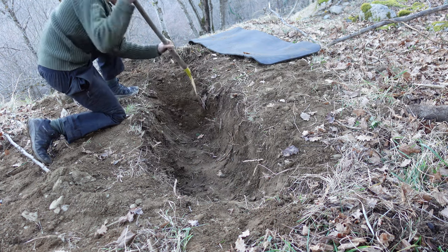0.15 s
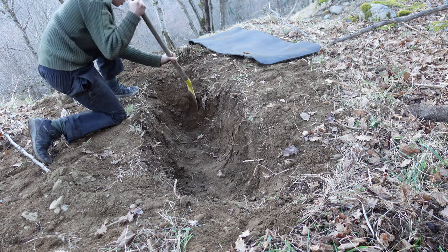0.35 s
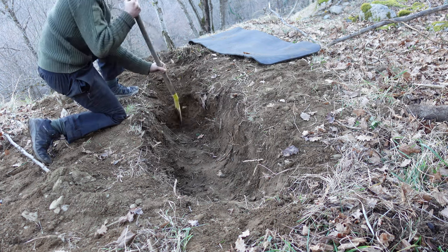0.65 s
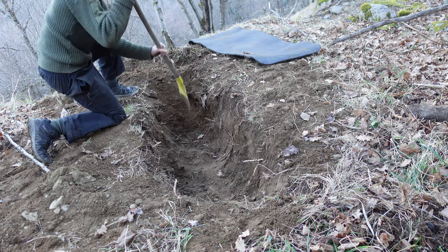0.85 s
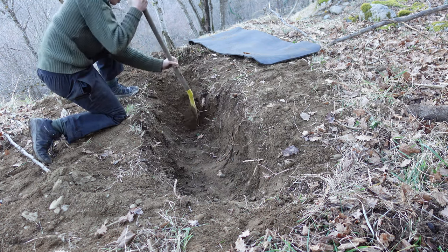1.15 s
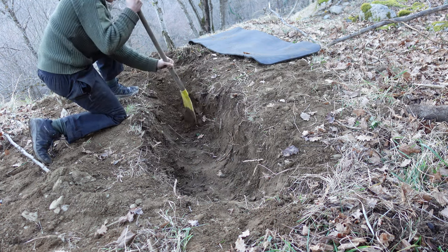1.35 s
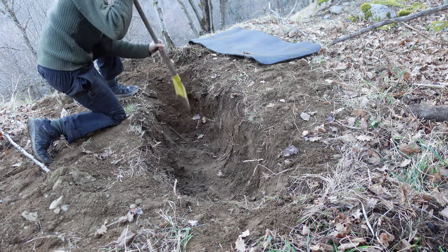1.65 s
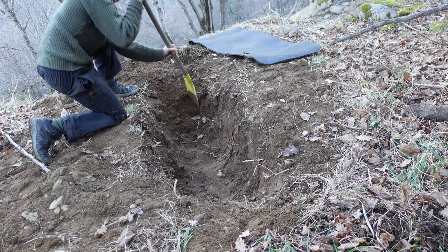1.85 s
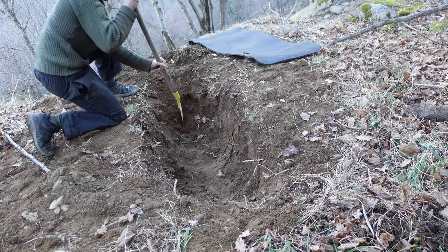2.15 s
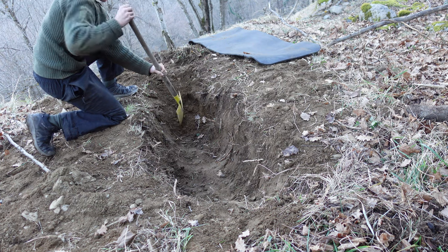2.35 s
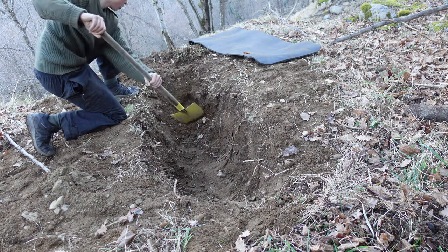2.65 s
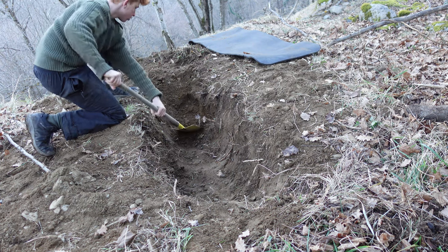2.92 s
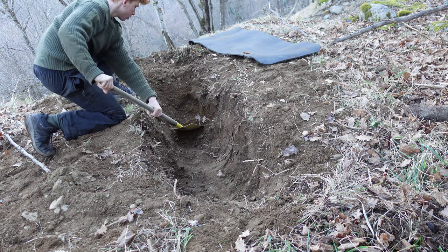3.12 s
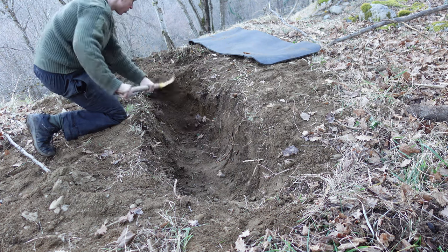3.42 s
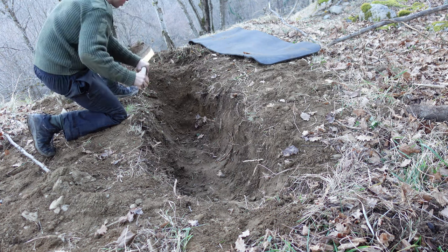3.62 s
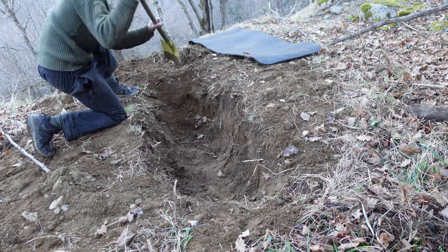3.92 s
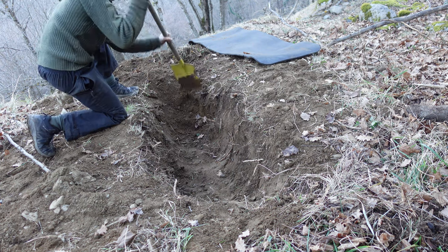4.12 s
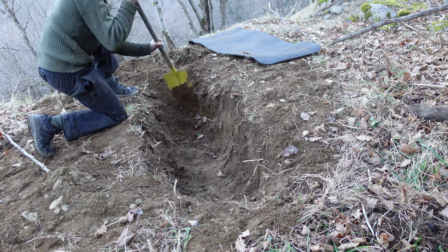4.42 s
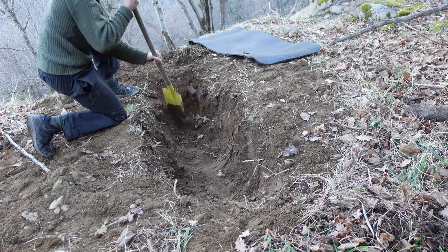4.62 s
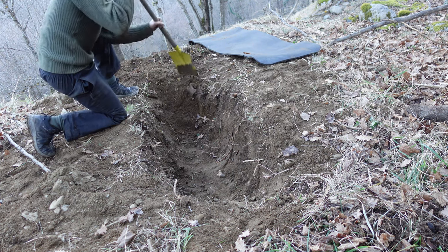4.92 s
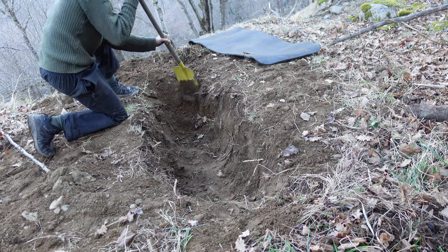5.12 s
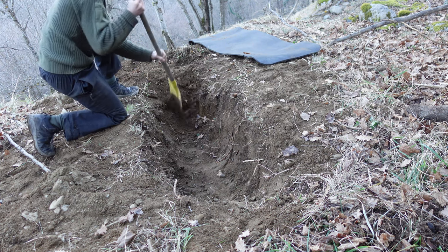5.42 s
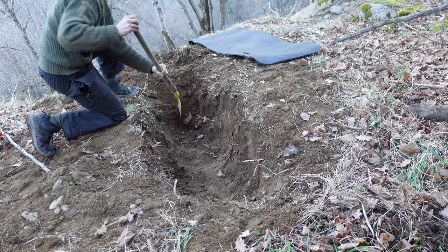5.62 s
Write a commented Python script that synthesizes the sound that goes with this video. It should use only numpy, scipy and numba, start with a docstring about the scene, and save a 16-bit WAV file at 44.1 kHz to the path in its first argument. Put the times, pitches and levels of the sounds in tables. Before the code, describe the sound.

A small steel shovel digs into stony soil on a wooded slope. Chops come irregularly, each a crisp gritty crunch with stone clacks and a soft low thud; a rapid clatter of stones follows just after two seconds. After a near-silent pause, the hardest, most ringing hits come around 4.2 to 4.5 seconds, then more chops past five. Close stereo microphones, dry and open, with a faint distant roar.

```python
"""Shovel in stony soil

A short steel shovel chops and scrapes into stony soil on a wooded slope.
Grit crunches along the blade as dense trains of grains; stones knock it with short pitched bursts of noise.
The blade is a bank of decaying modes, ringing when it is free and choked when buried.
Chops thud into the ground as low noise bursts; a far steady roar of shaped noise fills the valley."""
import sys
import numpy as np
from scipy import signal
from scipy.io import wavfile
from numba import njit

SR = 44100
rng = np.random.default_rng(int(sys.argv[2]) if len(sys.argv) > 2 else 0)


def transcribe(signal):
    """Save signal, clipped to [-1, 1], as a 16-bit WAV file at the path in sys.argv[1]."""
    frames = np.atleast_2d(signal).T
    limited = np.clip(frames, -1, 1)
    pcm = np.round(limited * 32767).astype(np.int16)
    wavfile.write(sys.argv[1], SR, pcm)


def invert_db(level):
    """Linear amplitude ratio for a level in decibels (20 dB per decade), elementwise."""
    return 10 ** (np.asarray(level, dtype=float) / 20)


N = 254456


def at_hz(points, hz):
    """Interpolation of a spectrum along a logarithmic frequency axis."""
    table = np.array(points)
    return np.interp(np.log(hz), np.log(table[:, 0]), table[:, 1])


def rms_one(x):
    """Normalisation to unit root mean square."""
    return x / np.sqrt(np.mean(x ** 2) + 1e-20)


def band(x, low_hz, high_hz):
    """Band-pass filtering with Butterworth slopes."""
    sos = signal.butter(2, [low_hz, min(high_hz, .45 * SR)], "band", fs=SR, output="sos")
    return signal.sosfilt(sos, x)


def drift(rate_hz):
    """Slow random modulation: white noise through a double-pole low-pass, unit spread."""
    pole = np.exp(-2 * np.pi * rate_hz / SR)
    slow = signal.lfilter([1], [1, -2 * pole, pole * pole], rng.standard_normal(N + SR))
    return rms_one(slow[SR:])   # the filter has settled by then


def spans(rows, elsewhere):
    """Piecewise-constant control: a value that holds over each span."""
    value = np.full(N, float(elsewhere))
    for start_s, end_s, inside in rows:
        value[round(start_s * SR):round(end_s * SR)] = inside
    return value


# Relative spectral density of the roar: pitch_hz [Hz], level_db [dB per Hz]
ROAR_SPECTRUM = [(15, -65), (25, -31), (114, -10), (180, -5), (223, -3.5), (277, -0.5), (317, -5.5),
                 (354, -1), (641, 2.5), (1440, 0), (2760, -12), (2990, -13), (5000, -21), (16000, -29.5)]
# Left-right correlation of the roar: pitch_hz [Hz], likeness [-1 to 1]
ROAR_LIKENESS = [(60, 1), (290, 0.78), (640, 0.83), (1410, 0.24), (3100, 0.05), (15000, 0.27)]
ROAR_DB = -54   # rms


def roar():
    """Diffuse field: far, smooth noise in half-octave bands, its channels least alike in the treble."""
    out, edges_hz = 0, 22 * 2 ** np.arange(0, 9.9, .5)
    swell_db = 1.1 * drift(1.5)
    white = rng.standard_normal((2, 2, N + SR))
    for k, (low, high) in enumerate(zip(edges_hz, edges_hz[1:])):
        mid, side = band(white[k % 2], low, high)[:, SR:]
        hz = np.sqrt(low * high)
        alike = np.clip(at_hz(ROAR_LIKENESS, hz), -1, 1)
        stereo = np.sqrt(1 + alike) * mid + np.sqrt(1 - alike) * side * [[1], [-1]]
        out = out + invert_db(at_hz(ROAR_SPECTRUM, hz) + swell_db) * stereo
    return invert_db(ROAR_DB) * rms_one(out)


# Chops into the ground: start_s [s], level_db [dB, peak of the thud]
THUDS_PLAYED = [(0.271, -46.5), (1.112, -41), (1.449, -46), (1.852, -42.5), (2.086, -48), (2.879, -45.5),
                (3.241, -54), (4.159, -42.5), (4.351, -49), (4.505, -50), (5.052, -48), (5.44, -54.5)]
THUD_T60_S, SHUDDER_DB = 0.19, -6   # decay; gain of the lower octave


def thuds():
    """Damped impact response: the ground takes a soft push and shudders low."""
    out, size = np.zeros(N), 9000
    t = np.arange(size) / SR
    for (start_s, level_db), noise in zip(THUDS_PLAYED, rng.standard_normal((len(THUDS_PLAYED), size))):
        push = noise * (1 - np.exp(-t / 0.0054)) * invert_db(-60 * t / THUD_T60_S)
        low = band(band(push, 54, 110), 54, 110)
        shudder = band(push, 107, 212) + invert_db(SHUDDER_DB) * low
        at = round(start_s * SR)
        out[at:at + size] += invert_db(level_db) * shudder / abs(shudder).max()
    return out


# The blade runs over bare rock: start_s [s], end_s [s], gain_db [dB on clods and dull knocks]
ROCK_SPANS = [(.53, .595, -6.5), (1.06, 1.1, -4.5), (1.81, 1.845, -7), (2.1, 2.22, -3.5), (2.9, 2.92, 5.5),
              (4.44, 4.495, -13), (5.26, 5.428, -17), (5.428, 5.48, -7.5), (5.585, 5.63, -9)]


def bare_rock():
    """Surface dependence: bare rock alters the level of the clods and dull knocks."""
    return spans(ROCK_SPANS, 0)


# Stones struck: start_s [s], level_db [dB, peak at stone pitch], pitch_hz [Hz], crack_db [dB over stone]
STONES = [(0.266, -16, 4220, -2), (.277, -16.5, 1620, -2), (0.285, -19, 1400, -9), (0.482, -35.5, 2490, -1),
          (.537, -18, 3000, -24), (.602, -22, 1670, -24), (.646, -27, 3350, -3), (.726, -38.5, 4500, -6),
          (1.067, -24.5, 2360, 3), (1.082, -19, 1410, 3), (1.109, -13.5, 1220, -8),
          (1.115, -13.5, 1400, -2), (1.193, -42, 1490, 0), (1.225, -35, 1450, -23),
          (1.309, -39.5, 2690, -3), (1.412, -30.5, 2770, 0.5), (1.458, -22.5, 2520, 0),
          (1.553, -44, 4000, -1), (1.829, -27.5, 1860, 8.5), (1.85, -13, 4020, 0),
          (1.856, -14, 1330, -12.5), (2.06, -16.5, 1850, -7.5), (2.074, -17, 1240, -7.5),
          (2.09, -15.5, 2370, -7.5), (2.115, -18, 2970, -4), (2.136, -16.5, 3950, -3),
          (2.154, -10.5, 2080, -14), (2.165, -24, 4480, -24), (2.209, -20.5, 3380, -26),
          (2.322, -29.5, 1750, -4), (2.361, -42.5, 1730, 11), (2.87, -20, 3400, 4), (2.888, -18, 3720, 1),
          (3.235, -13, 3170, -30), (3.246, -12.5, 5300, -30), (3.291, -27, 2500, -11),
          (3.435, -44.5, 4500, -5), (3.992, -53.5, 1660, 13), (4.156, -24, 1550, 3), (4.164, -9, 1490, -21),
          (4.281, -33, 2740, -18), (4.312, -16, 1125, -10.5), (4.347, -11.5, 2730, -4),
          (4.368, -12, 2350, -0.5), (4.412, -7, 1690, -16), (4.431, -8.5, 1690, -23),
          (4.445, -8, 1970, -25), (4.499, -11.5, 3400, 1.5), (4.509, -10.5, 2870, -33),
          (4.524, -13.5, 3230, -7.5), (4.621, -51, 1390, 5), (5.039, -13, 1130, -7),
          (5.047, -11.5, 1450, -11.5), (5.081, -20, 2600, -6), (5.18, -36, 3430, -17),
          (5.206, -37, 5500, -6), (5.264, -30, 3100, -6), (5.303, -38, 1380, 14.5), (5.325, -21, 3360, -14),
          (5.368, -33, 1680, -2), (5.388, -23.5, 6280, -23), (5.404, -12.5, 3320, -4),
          (5.432, -15.5, 2600, -4), (5.489, -22, 3090, -30), (5.588, -23, 2770, 0.5)]
STONE_T60_S, DULL_DB = 0.019, -19   # ring of a stone; dull knock relative to it


def knocks(rock_db):
    """Impact excitation: a dying burst of noise at each stone's pitch, a crack and a dull knock."""
    sound, size = np.zeros(N), 6000
    t = np.arange(size) / SR
    # the first touch is the sharpest
    decay = (1 + 1.96 * np.exp(-t / 0.0018)) * invert_db(-60 * t / STONE_T60_S)
    bursts = rng.standard_normal((len(STONES), 3, size)) * decay
    for (start_s, level_db, hz, crack_db), burst in zip(STONES, bursts):
        parts = (band(burst[0], hz / 1.386, hz * 1.343),
                 band(burst[1], 2930, 9800),
                 band(burst[2], 200, 840))
        stone, crack, dull = [part / abs(part).max() for part in parts]
        at = round(start_s * SR)
        knock = stone + invert_db(crack_db) * crack + invert_db(DULL_DB + rock_db[at]) * dull
        sound[at:at + size] += (invert_db(level_db) * knock)[:N - at]
    return sound


# The blade bites into grit: start_s [s, full push], level_db [dB, crunch], rise_s [s], hold_s [s],
# pitch_hz [Hz, rasp], sand_db [dB over crunch]
BITES_PLAYED = [(0.277, -25, 0.017, 0.0012, 1710, -7), (0.54, -19.5, .008, 0.0034, 2980, -10),
                (0.605, -26, 0.032, 0.00087, 2410, -7), (1.072, -30, 0.012, 0.0055, 2130, -4.5),
                (1.113, -23, 0.028, 0.00067, 1350, -5.5), (1.459, -36, 0.0062, 0.0091, 2360, -7.5),
                (1.852, -25.5, 0.032, 0.0055, 2160, -5.5), (2.059, -32.5, .009, 0.023, 1600, -8),
                (2.087, -21, 0.0024, 0.0073, 1690, -19), (2.165, -23.5, 0.087, .004, 2830, -7.5),
                (2.209, -39, 0.0018, .002, 3320, -32), (2.323, -38.5, 0.00083, 0.0032, 2040, -17),
                (2.361, -46.5, 0.0032, 0.0019, 1980, -4), (2.856, -25, 0.0034, 0.039, 3040, -10.5),
                (2.901, -37.5, .006, 0.0054, 1300, -6), (3.242, -26, 0.019, 0.0027, 3340, -4.5),
                (3.292, -35, 0.00195, 0.0051, 1990, -13), (4.159, -26, 0.0058, 0.027, 1620, -15),
                (4.309, -32.5, 0.0032, 0.034, 2240, -10.5), (4.354, -19, 0.018, 0.046, 2220, -15),
                (4.413, -22.5, 0.0089, 0.024, 2940, -15.5), (4.453, -34, .004, 0.0029, 1740, -37),
                (4.499, -24.5, 0.0022, .02, 3100, -8.5), (5.053, -18.5, 0.011, 0.0012, 1860, -12),
                (5.274, -43, 0.0022, 0.0066, 3060, 1), (5.302, -21, 0.0011, 0.0013, 1780, -13.5),
                (5.325, -33, 0.024, 0.0067, 1980, -1.5), (5.356, -36.5, 0.032, 0.018, 1790, -7.5),
                (5.404, -22, .002, 0.0013, 2990, -2.5), (5.431, -19, 0.0014, 0.014, 1900, -11),
                (5.49, -26.5, 0.0127, 0.009, 1650, -13.5), (5.589, -30, 0.0029, 0.0027, 2200, -22.5)]
# Light drags through loose soil: start_s [s], end_s [s], start_db [dB, crunch], end_db [dB, crunch],
# sand_db [dB over crunch]
DRAGS_PLAYED = [(0.42, 0.54, -65, -43.5, -7), (1.138, 1.297, -43, -63.5, -6.5),
                (1.305, 1.339, -55.5, -54, -7), (1.342, 1.451, -54.5, -46.5, -2.5),
                (1.496, 1.578, -53.5, -55, -8), (1.887, 2.05, -55.5, -56, -3.5),
                (2.936, 3.107, -52.5, -63, -5), (3.203, 3.218, -58, -59, 4), (3.327, 3.56, -61.5, -60, -8),
                (3.946, 4.07, -58, -67.5, -2.5), (4.185, 4.3, -36.5, -48.5, -16),
                (4.542, 4.679, -44.5, -62.5, -5.5), (5.08, 5.265, -44.5, -52.5, -8.5),
                (5.622, 5.769, -56, -63.5, -13)]
RISE_DB, RELEASE_DB_PER_S = 22, 1112.5   # swell over one rise time; fall once the push ends
# loosened soil runs on after each bite: level over the bite, fall, sand over crunch
CRUMBLE_DB, CRUMBLE_DB_PER_S, CRUMBLE_SAND_DB = -19.5, 145, -6.5
REST_DB, REST_RASP_HZ = -71, 1400   # soil that trickles between strokes
# clods over crunch at a light push; share of the crunch's swing that they follow
CLODS_DB, CLODS_FOLLOW, LIGHT_PUSH_DB = -5, 0.74, -55


def digging(rock_db):
    """Power summation: bites rise, hold and crumble; drags and the resting trickle add to them."""
    t = np.arange(N) / SR
    crunch = invert_db(2 * REST_DB) * np.ones(N)   # powers from here on
    sand = crunch * invert_db(2 * CRUMBLE_SAND_DB)
    rasp_hz = np.full(N, float(REST_RASP_HZ))
    for start_s, level_db, rise_s, hold_s, hz, sand_db in BITES_PLAYED:
        rise_s = max(rise_s, .001)
        part = slice(round((start_s - 2 * rise_s) * SR), round((start_s + .5) * SR))
        since_s = np.maximum(t[part] - start_s - hold_s, 0)
        swell_db = RISE_DB * np.minimum((t[part] - start_s) / rise_s, 0)
        push = invert_db(2 * (level_db + swell_db - RELEASE_DB_PER_S * since_s))
        tail = invert_db(2 * (level_db + CRUMBLE_DB - CRUMBLE_DB_PER_S * since_s)) * (since_s > 0)
        # a bite sets the rasp while it outweighs what already sounds
        rasp_hz[part] = np.where(push + tail > crunch[part], hz, rasp_hz[part])
        crunch[part] += push + tail
        sand[part] += push * invert_db(2 * sand_db) + tail * invert_db(2 * CRUMBLE_SAND_DB)
    for start_s, end_s, start_db, end_db, sand_db in DRAGS_PLAYED:
        power = invert_db(2 * np.interp(t, [start_s, end_s], [start_db, end_db])) * (t > start_s) * (t < end_s)
        crunch = crunch + power
        sand = sand + power * invert_db(2 * sand_db)
    crunch_db = 10 * np.log10(crunch)
    fine_db = 10 * np.log10(sand / crunch)
    clods_db = rock_db + CLODS_DB - (1 - CLODS_FOLLOW) * (crunch_db - LIGHT_PUSH_DB)
    return crunch_db, fine_db, clods_db, rasp_hz


def grains(per_s, spread_db):
    """Shot noise: random clicks of uneven size, bunching as lumps break; rate leaves mean power alone."""
    sizes = invert_db(spread_db * np.minimum(rng.exponential(1, N), 5)) * rng.choice([-1, 1], N)
    clicks = sizes * (rng.random(N) < per_s / SR) / np.sqrt(per_s)
    bunching = invert_db(3.35 * drift(40))
    return rms_one(clicks * bunching + 1e-18)


# Relative spectral density of the grit: pitch_hz [Hz], level_db [dB per Hz]
GRIT_SPECTRUM = [(120, -50), (200, -13.5), (353, -8.5), (1040, -3), (1810, 2.5), (1980, -3.5), (2650, 1),
                 (3430, 2), (5230, -5), (8420, -13), (13100, -26), (16000, -35)]
TRICKLE_PER_S, GRAINS_PER_S = 1200, 6000   # grain rates at a light and at a hard push


def grit(crunch_db, fine_db, clods_db, rasp_hz):
    """Granular friction: grains ring in third-octave bands, clods low, crunch mid, sand on top."""
    layers, edges_hz = np.zeros((3, N)), 260 * 2 ** np.arange(0, 6.1, 1 / 3)
    per_s = np.interp(crunch_db, [-62, -35], [TRICKLE_PER_S, GRAINS_PER_S])   # harder push, denser grains
    trains = [grains(per_s, 3.49) for _ in range(3)]
    for k, (low, high) in enumerate(zip(edges_hz, edges_hz[1:])):
        hz = np.sqrt(low * high)
        # 0 clods, 1 crunch, 2 sand, crossfading between
        place = np.interp(np.log(hz), np.log([850, 1500, 3800, 6500]), [0, 1, 1, 2])
        share = np.maximum(1 - abs(place - np.arange(3)), 0)[:, None]
        # the gripped blade colours the crunch
        rasp_db = 3.45 * share[1] * np.exp(-(np.log2(hz / rasp_hz) / 0.6) ** 2)
        ringing = band(trains[k % 3], low * 1.013, high / 1.02)
        layers += share * invert_db(at_hz(GRIT_SPECTRUM, hz) + rasp_db) * ringing
    clods, crunch, fine = map(rms_one, layers)
    return invert_db(crunch_db) * (crunch + invert_db(fine_db) * fine + invert_db(clods_db) * clods)


# The blade comes loose from the soil: start_s [s], end_s [s], t60_s [s, longest ring the soil allows]
LOOSE_SPANS = [(.6, .63, 0.062), (1.452, 1.494, 0.095), (2.315, 2.442, 0.21), (4.21, 4.302, .3),
               (4.41, 4.494, 0.53), (4.5, 4.528, 0.082), (5.06, 5.1, 0.15), (5.43, 5.468, 0.98),
               (5.53, 5.67, 0.48)]


def soil_hold():
    """Contact damping: the ring the soil allows is longer in most loose spans than when buried."""
    return spans(LOOSE_SPANS, 0.063)   # buried t60, s


@njit
def ring(drive, turn, keep, grip):
    """Damped resonator: one mode, the soil's grip adding to its loss from moment to moment."""
    out, state = np.zeros(len(drive)), 0j
    for i in range(len(drive)):
        state = state * turn * keep * grip[i] + drive[i]
        out[i] = state.imag
    return out


# Modes of the blade: pitch_hz [Hz], level_db [dB, response to the common force], t60_s [s, when free]
MODES = [(386, -8.5, 0.62), (635, -1, 0.26), (880, -10.5, 0.088), (965, -0.5, 0.33), (1222, -9.5, 0.18),
         (1322, -36, 0.41), (1465, 4, 0.37), (1695, -13, 0.49), (1762, -7, 0.36), (1862, -16, 0.72),
         (1990, -6, 0.81), (2220, -37, 0.21), (2390, -31, 0.056), (2487, -4, 0.786), (2770, -17, 0.12),
         (3112, -30, 0.057), (3377, -5.5, 0.11), (3680, -10.5, .09), (4740, -19, .1), (4740, -35, 0.11),
         (5100, -21, 0.12)]


def blade(drive, soil_t60_s, clinks):
    """Modal superposition: all modes under the common force, each also pushed in tune by its clinks."""
    out, pitches_hz = 0, np.array(MODES)[:, 0]
    grip = invert_db(-60 / (np.maximum(soil_t60_s, .01) * SR))
    for k, (hz, level_db, t60_s) in enumerate(MODES):
        push = invert_db(level_db) * drive
        for start_s, mode_hz, height_db, build_s in clinks:
            if np.argmin(abs(pitches_hz - mode_hz)) == k:
                i = np.arange(round(max(build_s, .001) * SR))
                tuned = np.cos(2 * np.pi * hz * i / SR)
                push[round(start_s * SR) + i] += 2 * invert_db(height_db) / len(i) * tuned
        held = grip ** min(hz / 900, 1)   # the slow bending modes feel the soil less
        turn = np.exp(2j * np.pi * hz / SR)
        out = out + ring(push, turn, invert_db(-60 / (t60_s * SR)), held)
    return out


SKID_S, SKID_LASTS_S, SKID_DB, SKID_HZ, SKID_BUILD_S = 4.426, .014, -16.5, 1600, 0.0071
SKID_BELOW_DB, SKID_ABOVE_DB = -15, -13.5   # per octave below and above the centre


def skid():
    """Broadband excitation: skidding off a stone, the blade sings in every mode, most near the centre."""
    octaves = np.log2(np.array(MODES)[:, 0] / SKID_HZ)
    heights_db = SKID_DB + abs(octaves) * np.where(octaves < 0, SKID_BELOW_DB, SKID_ABOVE_DB)
    return [(SKID_S + SKID_LASTS_S * rng.random(), mode[0], height_db, SKID_BUILD_S)
            for mode, height_db in zip(MODES, heights_db)]


# Contacts that set one mode singing: start_s [s], pitch_hz [Hz, nearest mode], height_db [dB], build_s [s]
SINGLE_CLINKS = [(.603, 1695, -30, 0.0017), (1.113, 1322, -16, 0.0016), (1.459, 386, -36, 0.0021),
                 (1.458, 1862, -33, 0.0033), (1.461, 2487, -33, 0.0028), (2.076, 1222, -13.5, 0.0052),
                 (2.093, 1862, -15.5, 0.0026), (2.323, 1695, -40, 0.0046), (2.855, 3112, -12, 0.0056),
                 (3.239, 386, -37, 0.0095), (3.292, 635, -33, .003), (4.16, 1465, -20.5, 0.0035),
                 (4.165, 1695, -20, .002), (4.2, 965, -28, 0.0039), (4.2, 2487, -35, .008),
                 (4.35, 2770, -9.5, 0.0086), (4.409, 1762, -15, 0.002), (4.438, 3112, -13, .01),
                 (4.44, 386, -24, .036), (5.061, 1762, -36, .0034), (5.302, 1465, -26, .0015),
                 (5.403, 2487, -17, 0.0059), (5.433, 1465, -18.5, 0.0024), (5.433, 386, -40, .005),
                 (5.53, 1465, -42, .035), (5.591, 1465, -34, 0.0033), (5.59, 965, -43.5, .0025)]
BLADE_DRIVE_DB = -45


def steel(contact):
    """Forced vibration: grit and stones shake the blade, clinks and the skid excite its modes in tune."""
    return blade(invert_db(BLADE_DRIVE_DB) * contact, soil_hold(), SINGLE_CLINKS + skid())


SCATTER_DB, SCATTER_T60_S, SCATTER_FROM_HZ = -8.5, 0.088, 3270


def slope(x):
    """Scattering: direct sound is nearly alike in both channels; litter and stones spread the treble."""
    x = signal.sosfilt(signal.butter(2, 12000, fs=SR, output="sos"), x)   # soft soil and air dull the top
    t = np.arange(1500) / SR
    litter = rng.standard_normal((2, len(t))) * invert_db(-60 * t / SCATTER_T60_S)
    litter = litter / np.sqrt(np.sum(litter ** 2, axis=1, keepdims=True))   # unit energy
    bright = band(x, SCATTER_FROM_HZ, .4 * SR) + invert_db(-9) * x
    scattered = np.array([signal.fftconvolve(bright, tail)[:N] for tail in litter])
    return x * invert_db([[-.2], [.2]]) + invert_db(SCATTER_DB) * scattered


def scene():
    """Superposition: the shovel on the slope over the roar."""
    rock_db = bare_rock()
    contact = grit(*digging(rock_db)) + knocks(rock_db)
    shovel = contact + steel(contact) + thuds()
    return slope(shovel) + roar()


def band_limit(x):
    """A steep low-pass at the top of the band."""
    return signal.sosfilt(signal.butter(12, 15900, fs=SR, output="sos"), x)


def record(dry):
    """Signal chain: the finished stereo mix goes straight to the last stage."""
    return band_limit(dry)


dry = scene()
out = record(dry)
transcribe(out)
```